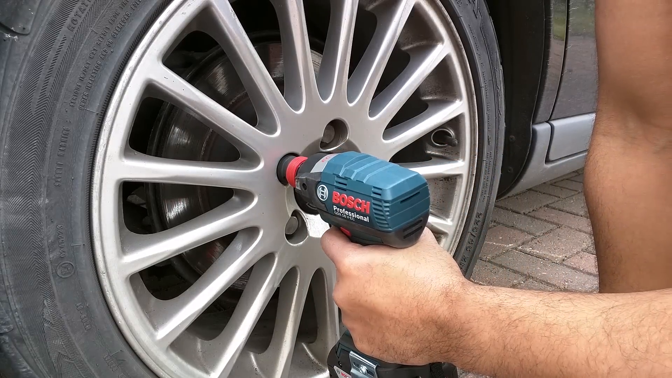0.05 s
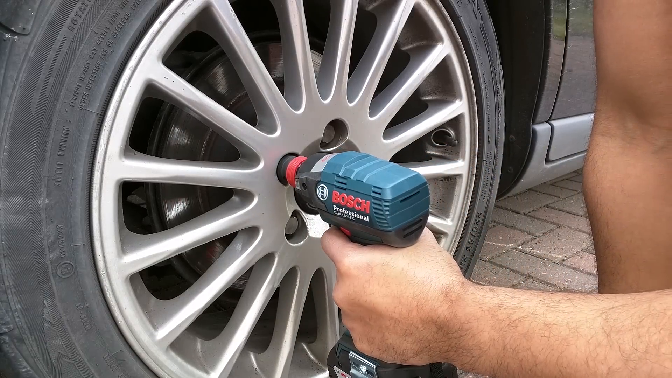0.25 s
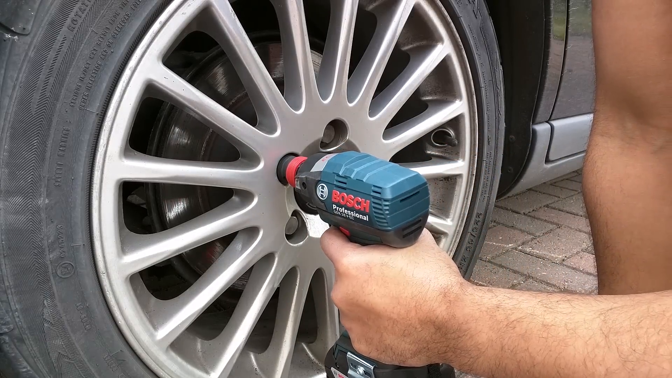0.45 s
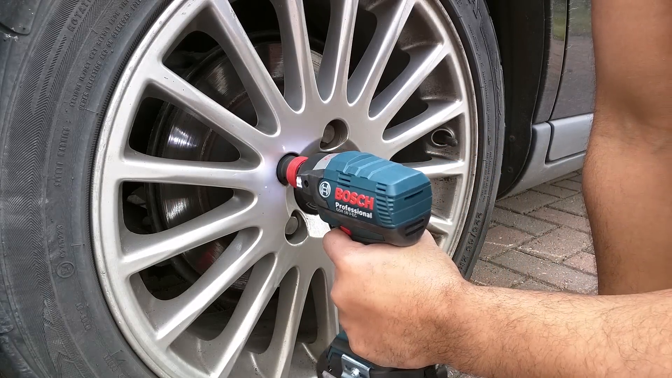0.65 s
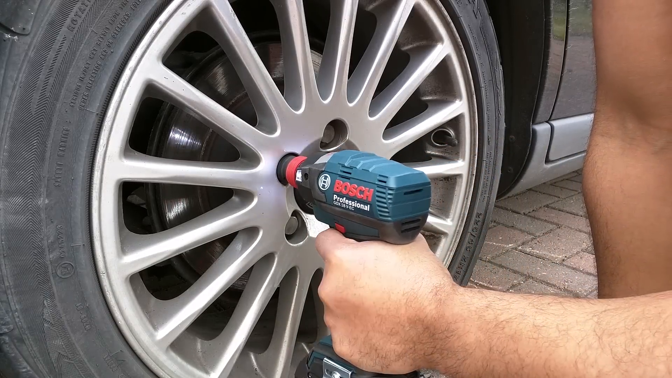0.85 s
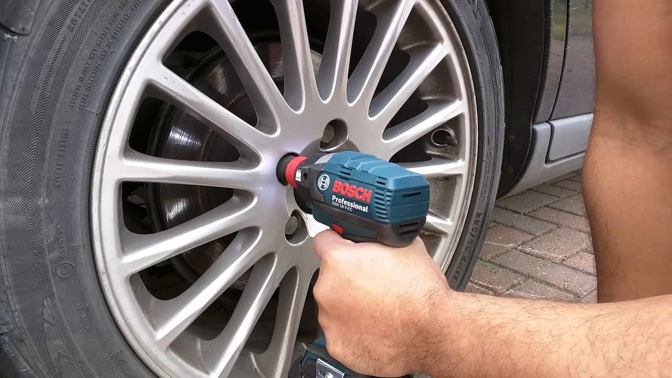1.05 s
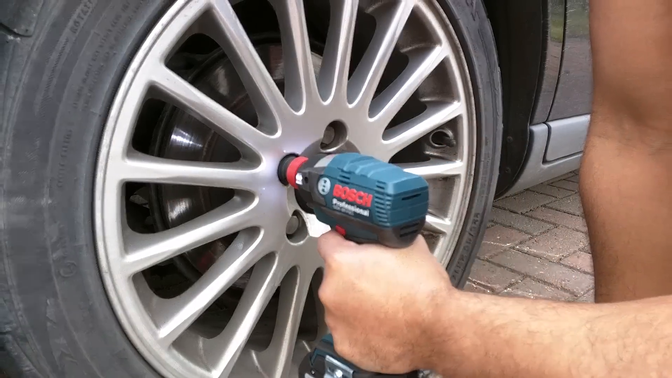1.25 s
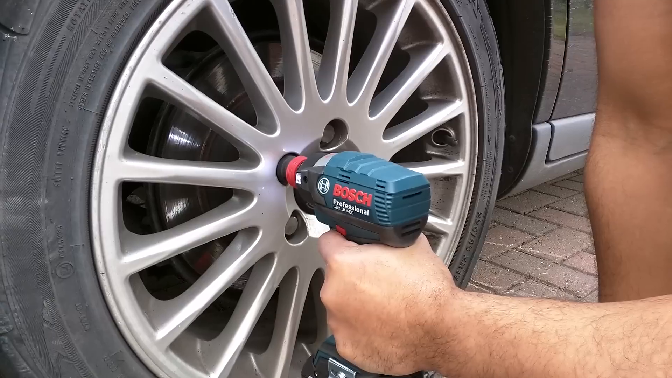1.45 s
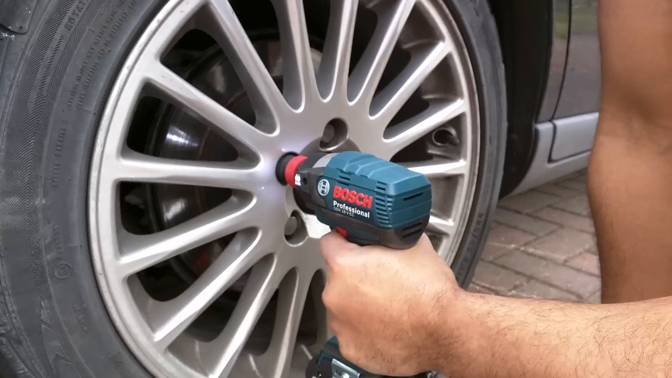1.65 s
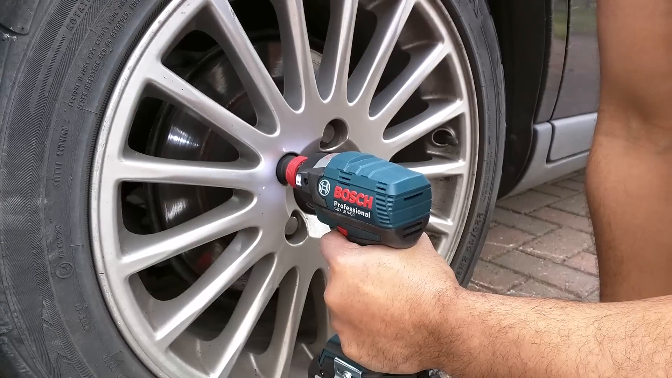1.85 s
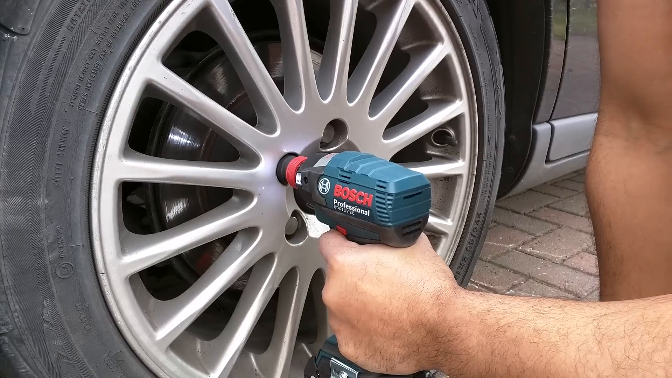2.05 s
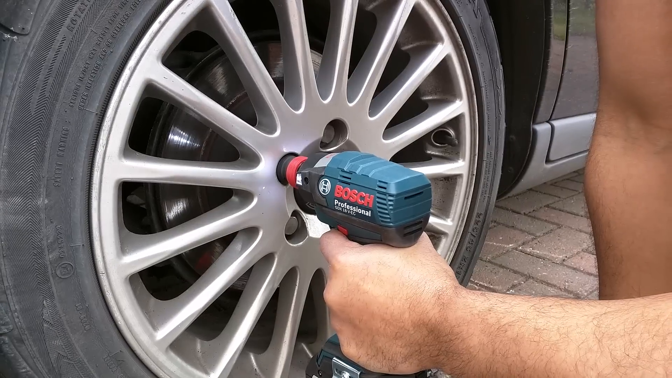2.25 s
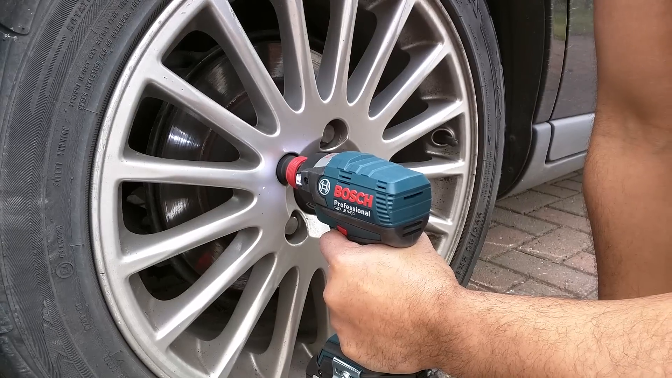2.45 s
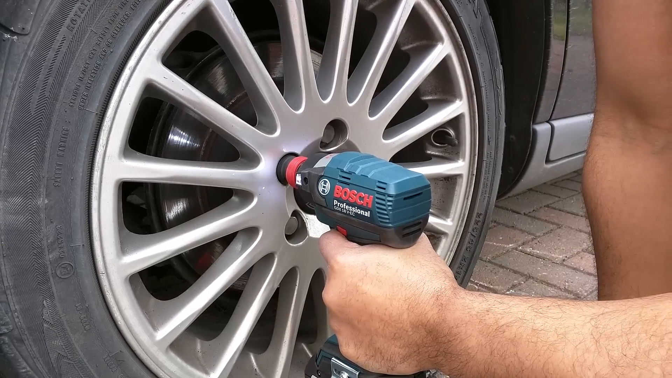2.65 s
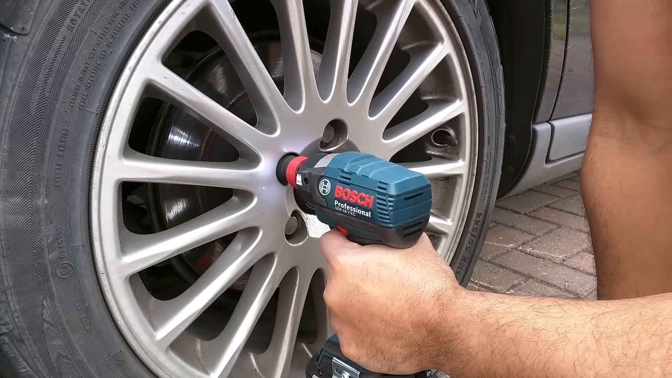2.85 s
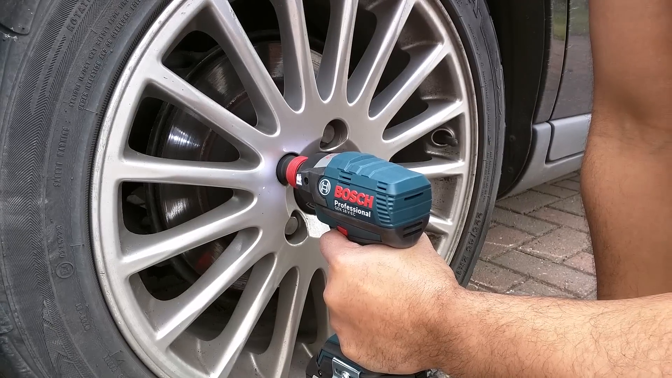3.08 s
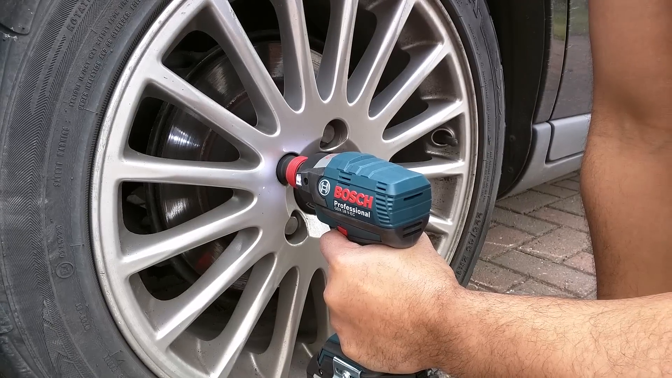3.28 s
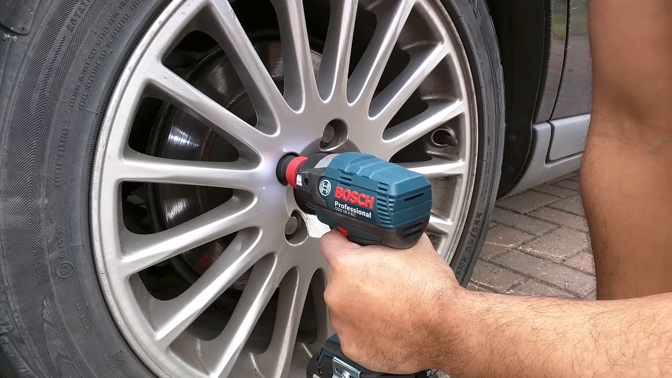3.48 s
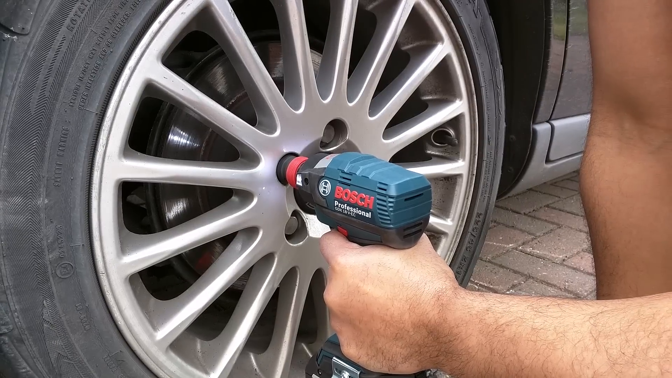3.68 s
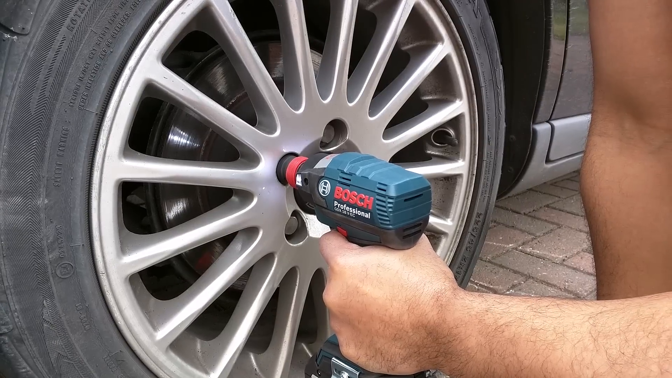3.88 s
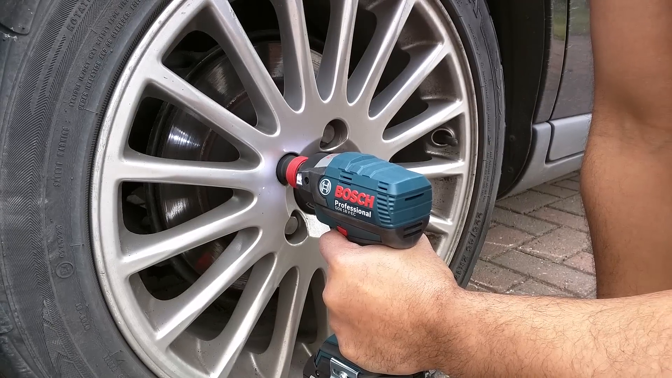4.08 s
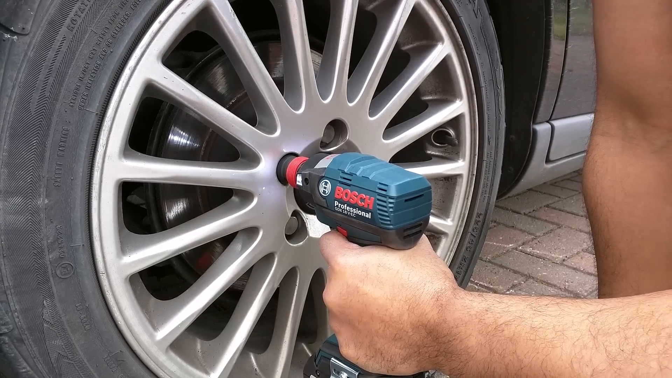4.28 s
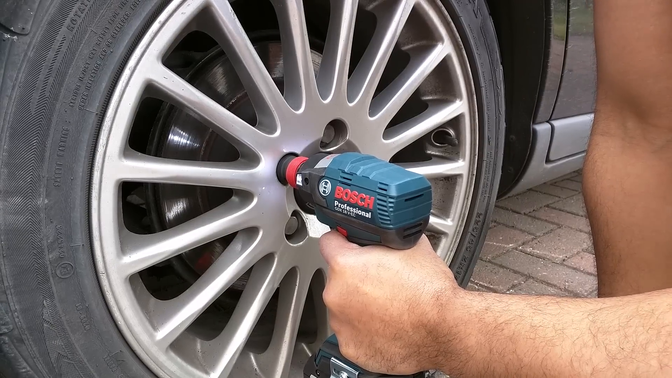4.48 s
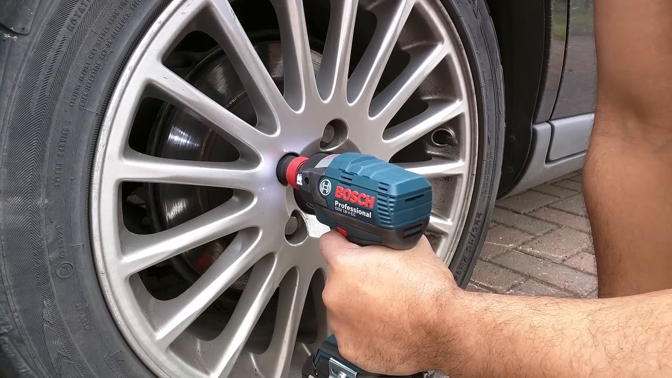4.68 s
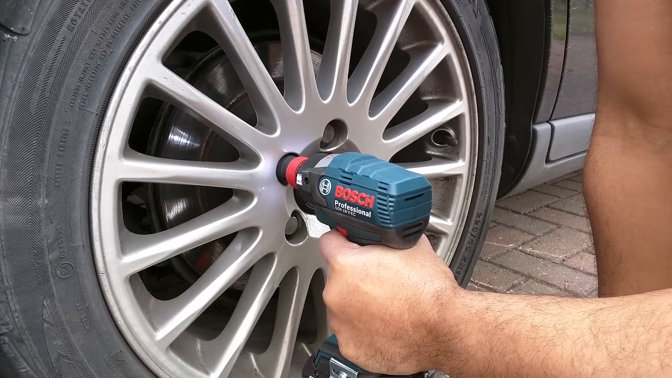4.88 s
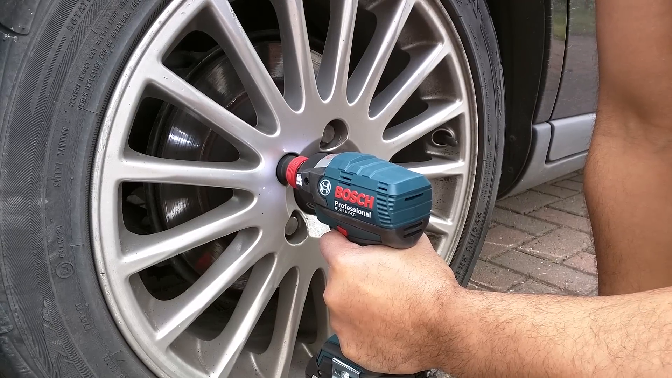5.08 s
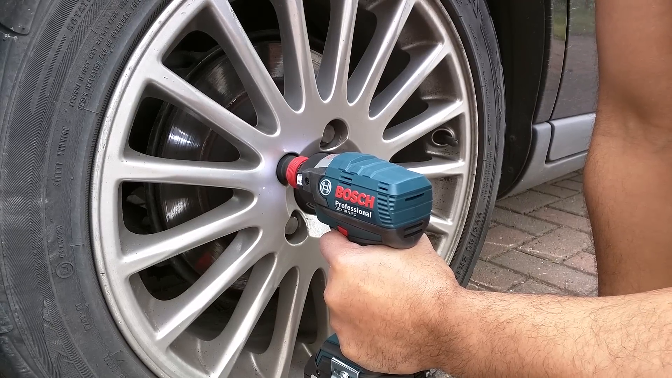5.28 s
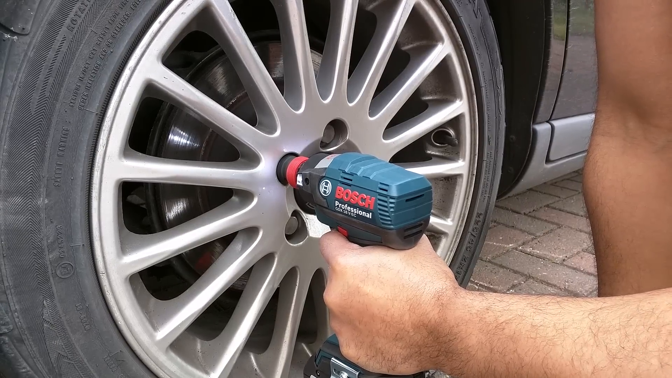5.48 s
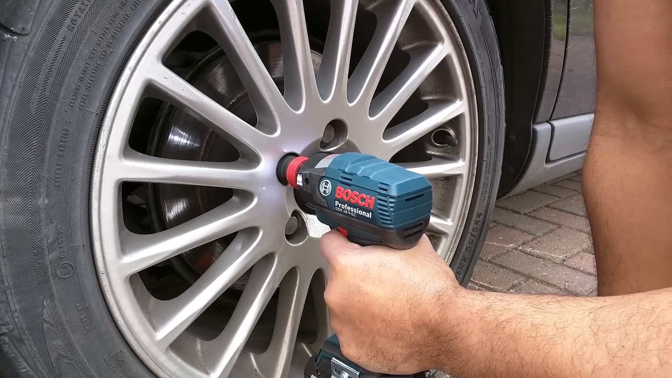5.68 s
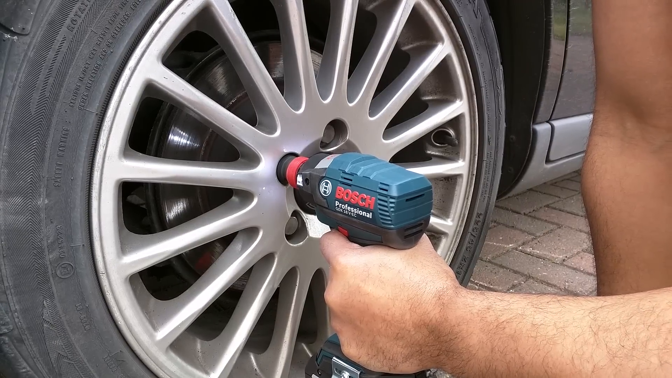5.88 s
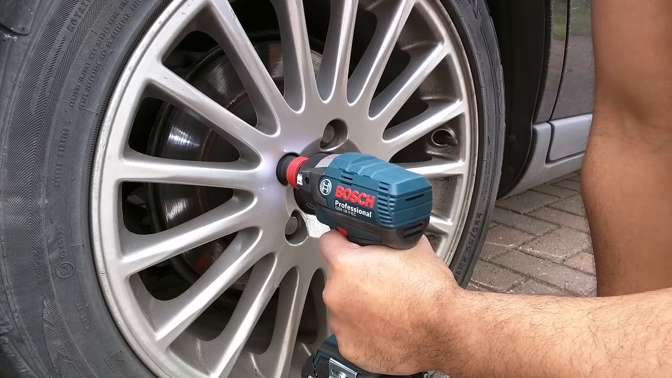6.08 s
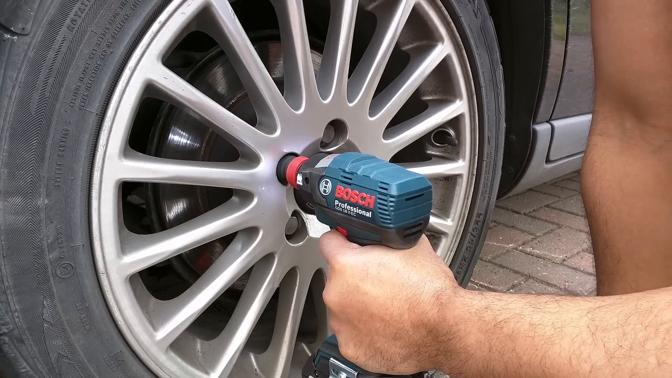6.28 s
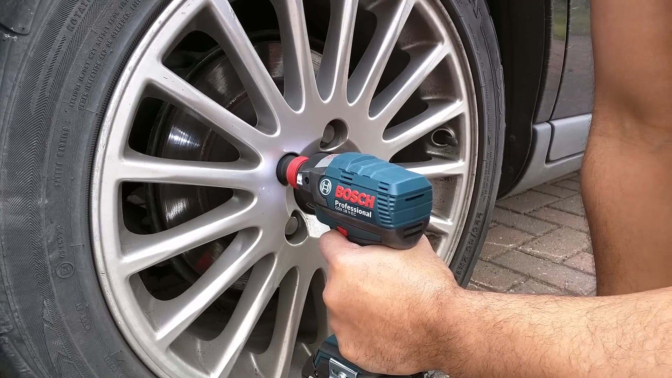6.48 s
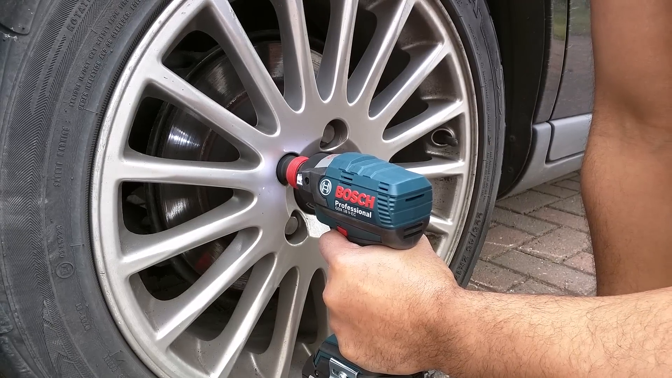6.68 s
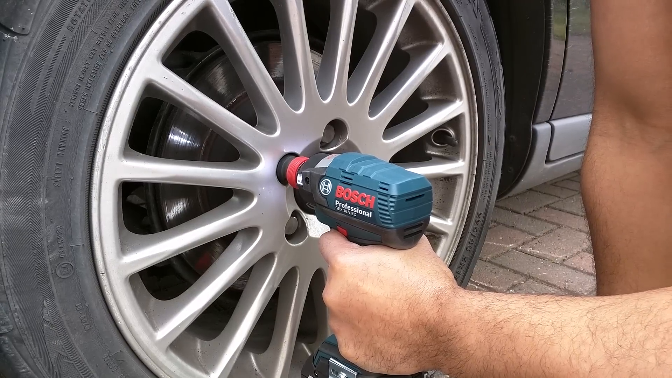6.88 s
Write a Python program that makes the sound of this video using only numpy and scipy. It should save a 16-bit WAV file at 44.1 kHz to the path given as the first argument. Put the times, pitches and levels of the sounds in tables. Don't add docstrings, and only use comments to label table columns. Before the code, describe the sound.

Soft wind rumble and faint insects, then a power wrench slams and rattles in a loud, steady metal buzz against an alloy wheel until the end.

```python
import sys
import numpy as np
from scipy import signal
from scipy.io import wavfile

SR = 44100
rng = np.random.default_rng(int(sys.argv[2]) if len(sys.argv) > 2 else 0)


def put_to_file(sound):
    columns = np.atleast_2d(sound).T
    safe = np.clip(columns, -1, 1)
    whole_steps = np.round(safe * 32767)
    wavfile.write(sys.argv[1], SR, whole_steps.astype(np.int16))


def to_linear_factor(level_db):
    exponent = np.asarray(level_db, float) / 20
    return 10 ** exponent


N = 306054

# resonance in Hz, width in Hz, level in dB.
RIM = [(646, 21.6, -8), (724, 36, -4.5), (812, 86, -11.5), (910, 22, -7.5), (993, 19, -9), (1192.3, 25, 2),
       (1319, 27, 1.5), (1450, 69, -3), (1652, 68, -17)]
# resonance in Hz, width in Hz, level in dB.
WHEEL = [(1878, 110, -10), (2255, 78, -6.5), (2495, 106, -1.5), (2697, 135, -2.5), (3198, 83, 1.5),
         (3375, 48, 5.5), (3640, 200, -1.5), (3877, 170, -6.5), (4390, 146, -7)]
FIRST_BLOWS_S = [
    .7873,
    .8022,
    .8103,
]
STEADY_S = .826
LEAD_S = .0006


def wrench():
    # resonance in Hz, width in Hz, level in dB.
    shudder_modes = [(69, 20, -25), (140.5, 42.5, 1), (226, 77, 0), (278, 196, -3.5), (433, 112, 0.5),
                     (548, 340, -7)]
    # resonance in Hz, width in Hz, level in dB.
    socket_modes = [(4786, 83, 3), (4610, 98, 0.5), (5780, 100, -5), (7230, 38, 6), (8400, 48, -25),
                    (8130, 64, 7.5), (8920, 270, -6), (9420, 146, 10), (9800, 230, 2), (10130, 190, 11.5),
                    (11000, 400, 1), (11590, 310, 13), (12500, 140, -3), (13700, 370, 6)]
    # frequency in Hz, level in dB per Hz.
    crack_spectrum = [(400, -29.5), (700, -23), (1100, -22.5), (1300, -13), (2080, -10), (2980, -11.5),
                      (3400, -4), (6210, -4), (11400, 2.5), (15600, -2)]
    rattle_db, ring_db, thud_db = effort()
    at, last = blow_times(jitter_s=.00008)
    heavy = rattle(at, last, rise_s=.0004, fall_s=.0025, settle_db=-14,
                   rebound_s=.0072, rebound_db=-6, repeat=.45)
    light = rattle(at, last, rise_s=.0004, fall_s=.0018, settle_db=-10,
                   rebound_s=.0075, rebound_db=-26, repeat=.3)
    knock = pushes(at, delay_s=.0013, jitter_s=.00006) * to_linear_factor(4 * (-1.) ** (last + 1))
    shove = pushes(at, delay_s=.00081, jitter_s=.00026)
    thud = struck(shudder_modes, shove, last, spread_db=1.5, dog_db=2)
    rim_push = pushes(at, delay_s=.0003, jitter_s=.00009) + to_linear_factor(-6) * heavy
    rim = struck(RIM, rim_push, last, spread_db=1.5, dog_db=-.35)
    spokes = struck(WHEEL, heavy + to_linear_factor(-3) * knock, last, spread_db=.76, dog_db=-1.3)
    socket = struck(socket_modes, light, last, spread_db=1, dog_db=-.5)
    blow_gain = to_linear_factor(.65 * rng.standard_normal(len(at)))
    crack = coloured(light * blow_gain[last] + to_linear_factor(-14) * knock, crack_spectrum)
    wheel = to_linear_factor(-10.5) * rim + to_linear_factor(-7.5) * spokes
    metal = to_linear_factor(rattle_db - .5) * socket + to_linear_factor(rattle_db + 2.5) * crack
    return to_linear_factor(thud_db) * thud + to_linear_factor(ring_db) * wheel + metal


def effort():
    slam_s, seat_s = .024, .11
    age = np.maximum(np.arange(N) / SR - FIRST_BLOWS_S[0], 0)
    slam = np.exp(-age / slam_s)
    loose = np.exp(-age / seat_s)
    second_s = FIRST_BLOWS_S[1] - FIRST_BLOWS_S[0] - LEAD_S
    third_s = FIRST_BLOWS_S[2] - FIRST_BLOWS_S[0] - LEAD_S
    glance = (age > second_s) & (age < third_s)
    rattle_db = -17 - 2 * glance
    ring_db = -16.5 + 10.5 * slam - 4 * loose - .27 * age
    thud_db = -35.5 + 19.5 * slam - 8.5 * loose
    return rattle_db, ring_db, thud_db


def blow_times(jitter_s):
    # time in seconds, blows per second.
    pace = [
        (.826, 68.487),
        (1.15, 69.121),
        (1.4, 69.866),
        (1.6, 69.103),
        (2.3, 68.675),
        (3.5, 68.468),
        (5.5, 67.763),
        (7, 67.783),
    ]
    s = np.arange(STEADY_S, 7, 1e-4)
    blow_count = np.cumsum(np.interp(s, *np.transpose(pace))) * 1e-4
    steady_blows_s = np.interp(np.arange(int(blow_count[-1])), blow_count, s)
    at_s = np.r_[FIRST_BLOWS_S, steady_blows_s] - LEAD_S
    at_s = at_s + jitter_s * rng.standard_normal(len(at_s))
    at = (at_s[at_s < (N - 1) / SR] * SR).astype(int)
    last = np.searchsorted(at, np.arange(N), "right") - 1
    return at, np.maximum(last, 0)


def pushes(at, delay_s, jitter_s):
    clicks = np.full(N, 1e-18)
    late = (delay_s + jitter_s * rng.standard_normal(len(at))) * SR
    clicks[np.clip(at + late.astype(int), 0, N - 1)] = 1
    return rms_one(clicks)


def rattle(at, last, rise_s, fall_s, settle_db, rebound_s, rebound_db, repeat):
    since = np.maximum(np.arange(N) - at[last], 0)
    age = since / SR
    rise = rise_s * to_linear_factor(1.5 * rng.standard_normal(len(at)))[last]
    late = age - rebound_s * to_linear_factor(.95 * rng.standard_normal(len(at)))[last]
    decay = np.exp(-age / fall_s) + to_linear_factor(settle_db) * np.exp(-age / .0073)
    rebound = (late > 0) * np.exp(-np.abs(late) / .0012)
    shape = (1 - np.exp(-age / rise)) * decay + to_linear_factor(rebound_db) * rebound
    fresh = rng.standard_normal((len(at) + 20, since.max() + 1))
    habit = signal.lfilter([1], [1, 0, -repeat], fresh, axis=0)[20:]
    grit = to_linear_factor(.86 * rng.standard_normal(N // 16 + 1)).repeat(16)[:N]
    return rms_one(shape * habit[last, since] * grit)


def struck(modes, source, last, spread_db, dog_db):
    out = np.zeros(N)
    blows = last[-1] + 1
    for k, (hz, width, level_db) in enumerate(modes):
        dogs = dog_db * (-1) ** (np.arange(blows) + (hz > 2000))
        strength_db = level_db + dogs + spread_db * rng.standard_normal(blows)
        out += (-1) ** k * resonate(source * to_linear_factor(strength_db)[last], hz, width)
    return rms_one(out)


def resonate(x, hz, width):
    r = np.exp(-np.pi * width / SR)
    poles = [1, -2 * r * np.cos(2 * np.pi * hz / SR), r * r]
    return signal.lfilter([(1 - r * r) / 2, 0, (r * r - 1) / 2], poles, x)


def rms_one(x):
    return x / np.sqrt(np.mean(x ** 2) + 1e-20)


def coloured(x, spectrum):
    hz = np.linspace(0, SR / 2, 1025)
    corner_hz, corner_db = np.transpose(spectrum)
    level_db = np.interp(np.log(hz + 1), np.log(corner_hz), corner_db)
    taps = signal.firwin2(1023, hz, to_linear_factor(2 * level_db) + 1e-9, fs=SR)
    return rms_one(signal.fftconvolve(x, signal.minimum_phase(taps))[:N])


def motor():
    # frequency in Hz, level in dB per Hz.
    gear_spectrum = [(200, -19), (500, -8.5), (1200, 8.5), (2000, 1.5), (3300, 3.5), (6000, 0.5),
                     (11000, -13.5), (16000, -3)]
    # time in seconds, gear hiss in dB.
    motor_levels = [
        (.755, -110),
        (.77, -52),
        (.773, -41),
        (.786, -26),
        (1.2, -27),
        (6.94, -25),
    ]
    trigger_s, trigger_db = .7712, -48
    t = np.arange(N) / SR
    age = t - trigger_s
    clack = (age > 0) * np.exp(-np.abs(age) / .003) * rng.standard_normal(N)
    ring = struck(RIM + WHEEL, clack + 1e-18, np.zeros(N, int), spread_db=0, dog_db=0)
    hiss_db = np.interp(t, *np.transpose(motor_levels))
    hiss = to_linear_factor(hiss_db) * coloured(rng.standard_normal(N), gear_spectrum)
    return hiss + to_linear_factor(trigger_db - 20) * ring + to_linear_factor(trigger_db + 27) * clack


def yard(x):
    out = x.copy()
    for lag_s, echo_db in ((.0031, -24), (.0087, -52), (.019, -14), (.034, -27)):
        lag = round(lag_s * SR)
        out[lag:] += to_linear_factor(echo_db) * signal.lfilter([.6], [1, -.4], x[:-lag])
    return out


def breeze():
    # gust peak in seconds, rumble in dB, flutter in dB.
    gusts = [(.136, -28.5, -28.5), (.308, -32, -40), (.41, -40, -48), (.49, -35, -37), (.71, -40, -42),
             (.805, -50, -36), (3.65, -51, -48), (4.66, -50, -58), (5.44, -47, -56), (6.21, -33, -35),
             (6.34, -45, -43), (6.53, -34, -42), (6.78, -39, -47)]
    rise_s, fall_s = .04, .058
    s, rumble_db, flutter_db = np.transpose(gusts)
    lull_db = np.where(np.arange(N) < STEADY_S * SR, 0, -13)
    rumble_gain = to_linear_factor(lull_db - 37.5) + swells(s, 0, rumble_db, rise_s, fall_s)
    flutter_gain = to_linear_factor(lull_db - 47.5) + swells(s, 0, flutter_db, rise_s / 2, fall_s / 2)
    return rumble_gain * wind_band(18, 60) + flutter_gain * wind_band(85, 203)


def wind_band(low_hz, high_hz):
    band = signal.butter(2, [low_hz, high_hz], "band", fs=SR, output="sos")
    return rms_one(signal.sosfilt(band, rng.standard_normal(N)))


def swells(start_s, hold_s, level_db, rise_s, fall_s):
    age = np.arange(N) / SR - np.asarray(start_s)[:, None]
    after_hold = np.maximum(age - np.reshape(hold_s, (-1, 1)), 0)
    return to_linear_factor(level_db) @ np.exp(np.minimum(age, 0) / rise_s - after_hold / fall_s)


def insects():
    # start in seconds, hold in seconds, level of the main note in dB.
    insect_calls = [
        (.075, .04, -56),
        (.275, .03, -60),
        (.42, 0.077, -63.5),
        (.655, .015, -67),
    ]
    # pitch in Hz, width in Hz, level in dB.
    insect_notes = [(7700, 110, 0), (7440, 220, -7)]
    # start in seconds, hold in seconds, level in dB.
    chirr_calls = [
        (.16, .14, -75),
    ]
    # pitch in Hz, width in Hz, level in dB.
    chirr_notes = [(10700, 110, 2), (12500, 120, -1), (8500, 200, -4)]
    out = np.zeros(N)
    for calls, notes in ((insect_calls, insect_notes), (chirr_calls, chirr_notes)):
        air = rng.standard_normal(N)
        song = np.zeros(N)
        for hz, width, level_db in notes:
            song += to_linear_factor(level_db) * resonate(resonate(air, hz, width), hz, width)
        out += swells(*np.transpose(calls), rise_s=.012, fall_s=.03) * rms_one(song)
    return out


def traffic():
    # frequency in Hz, level in dB per Hz.
    street_spectrum = [(150, -26), (250, -3.5), (318, -12), (341, -9.5), (1050, -12.5), (6880, -37.5),
                       (7640, -39), (8180, -37.5), (15500, -43)]
    level_db = -42.5 + np.where(np.arange(N) < FIRST_BLOWS_S[0] * SR, 0, -8)
    return to_linear_factor(level_db) * coloured(rng.standard_normal(N), street_spectrum)


def scene():
    return (yard(wrench() + motor()) + breeze() + insects() + traffic())[None]


def band_limit(x):
    return signal.sosfilt(signal.butter(12, 15870, fs=SR, output="sos"), x)


def record(dry):
    jolt_s, jolt_db, bass_cut_hz = .9432, -13, 2.5
    step = to_linear_factor(jolt_db) * (np.arange(N) > jolt_s * SR)
    pole = np.exp(-2 * np.pi * bass_cut_hz / SR)
    jolt = signal.lfilter([1, -2, 1], [1, -2 * pole, pole * pole], step)
    top_cut = signal.ellip(12, .25, 45, 15810, fs=SR, output="sos")
    heard = signal.sosfiltfilt(top_cut, dry)
    squeezed = heard / (1 + np.abs(heard / .78) ** 6) ** (1 / 6)
    return band_limit(signal.sosfiltfilt(top_cut, squeezed + jolt))


dry = scene()
out = record(dry)
put_to_file(out)
```